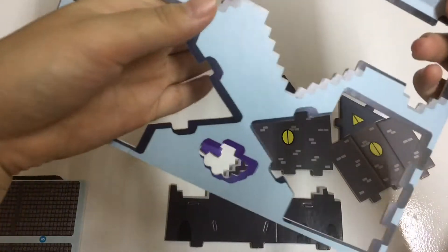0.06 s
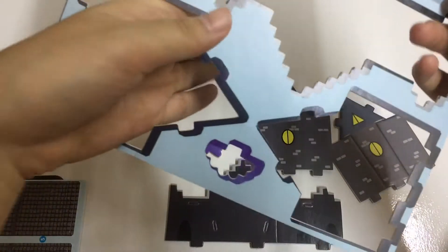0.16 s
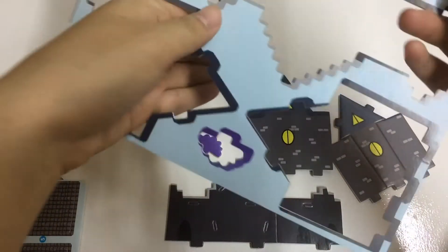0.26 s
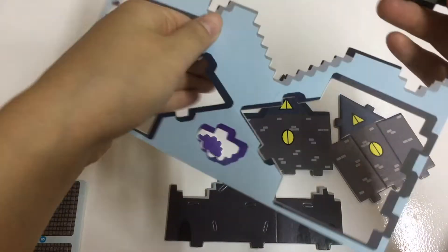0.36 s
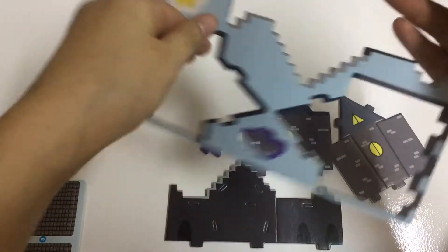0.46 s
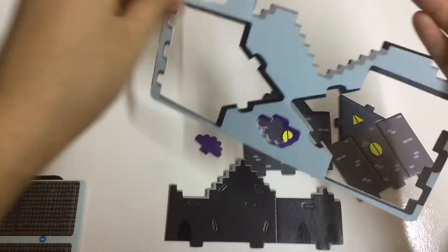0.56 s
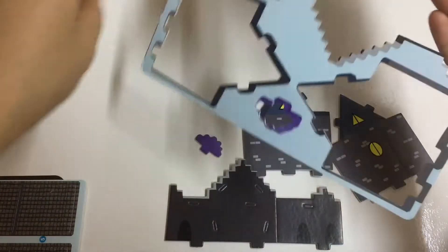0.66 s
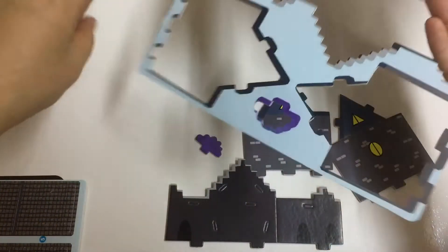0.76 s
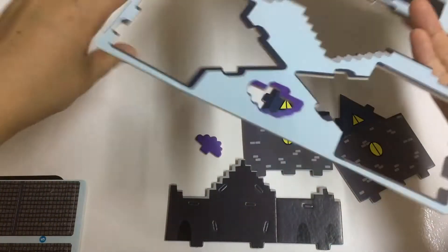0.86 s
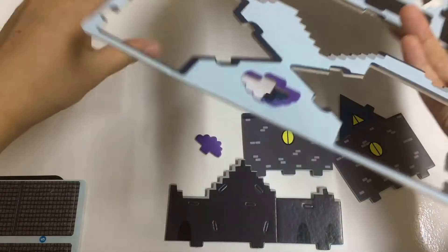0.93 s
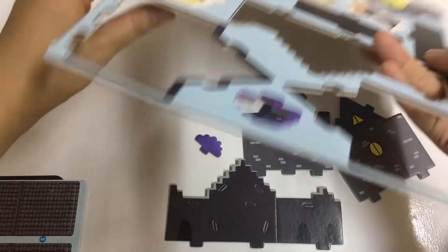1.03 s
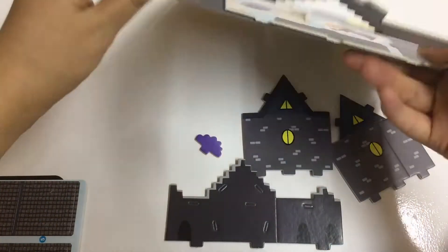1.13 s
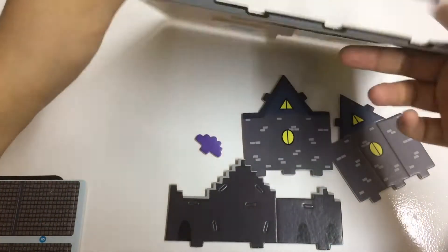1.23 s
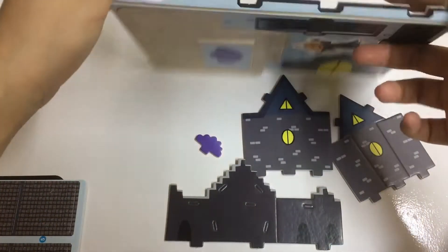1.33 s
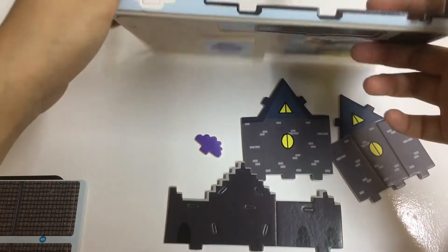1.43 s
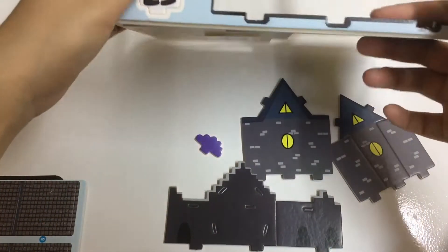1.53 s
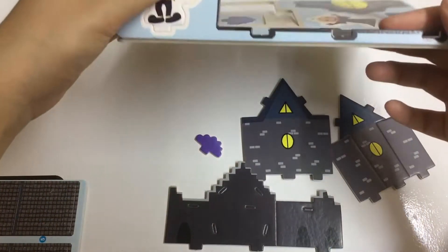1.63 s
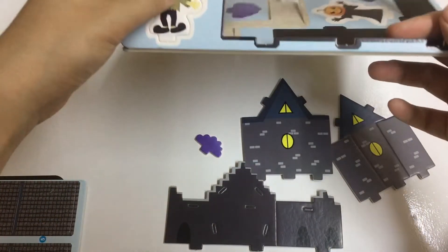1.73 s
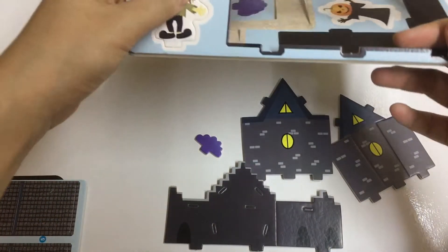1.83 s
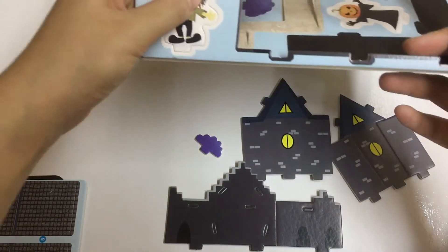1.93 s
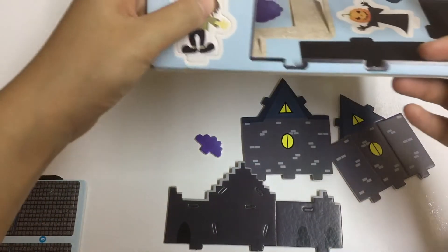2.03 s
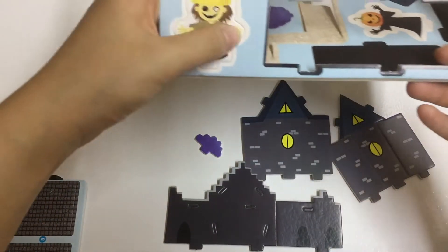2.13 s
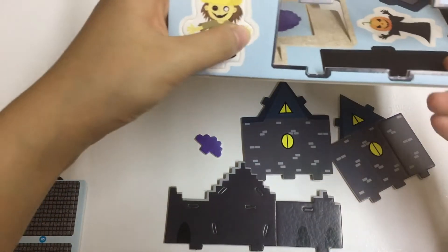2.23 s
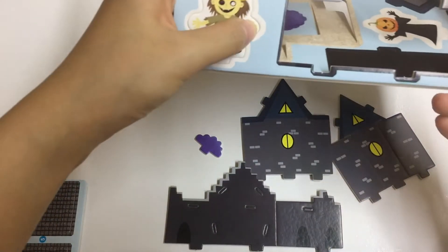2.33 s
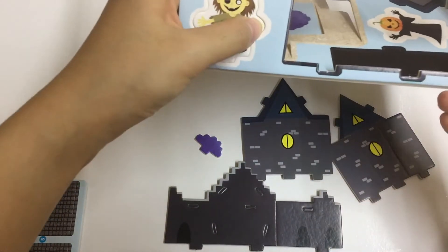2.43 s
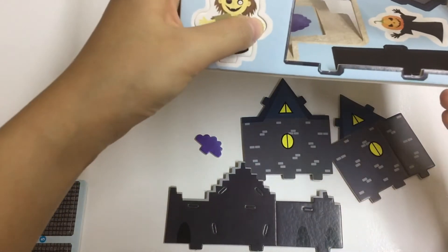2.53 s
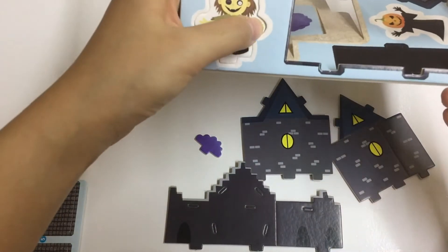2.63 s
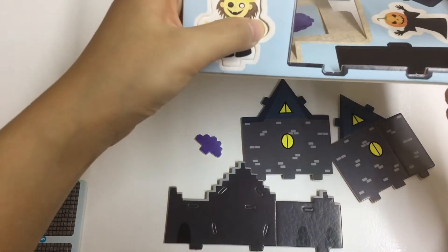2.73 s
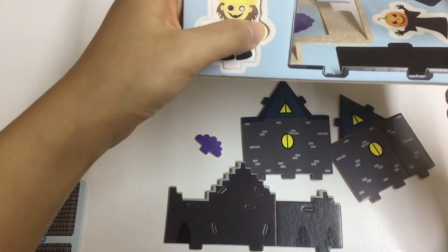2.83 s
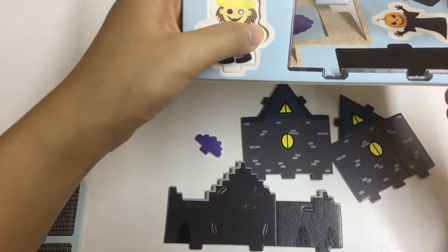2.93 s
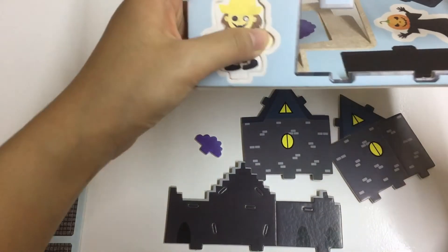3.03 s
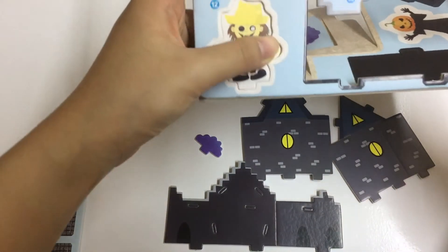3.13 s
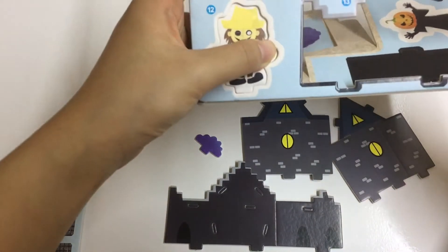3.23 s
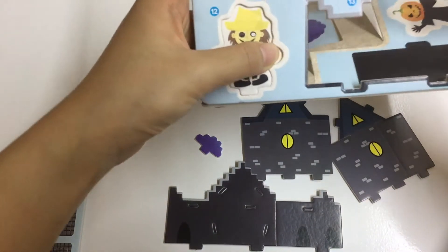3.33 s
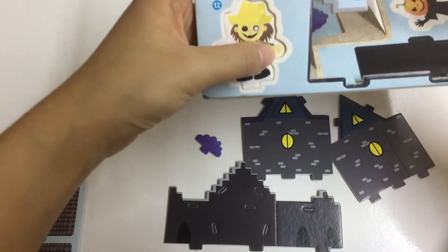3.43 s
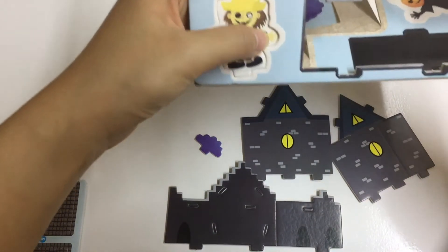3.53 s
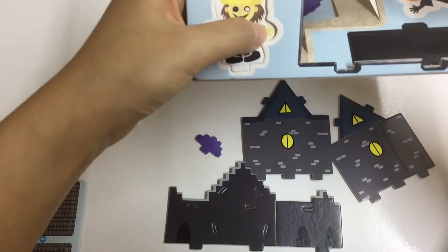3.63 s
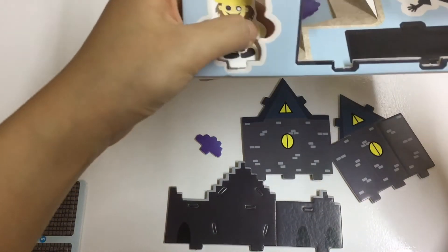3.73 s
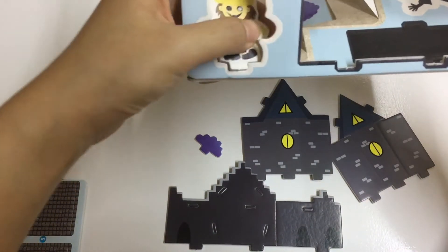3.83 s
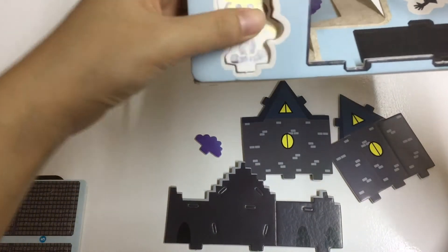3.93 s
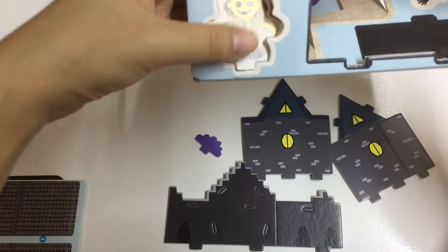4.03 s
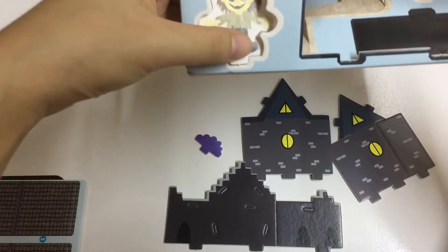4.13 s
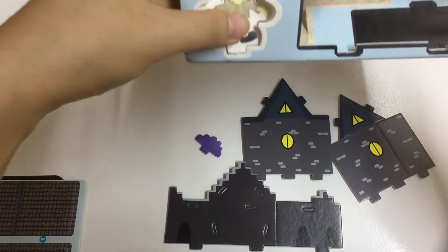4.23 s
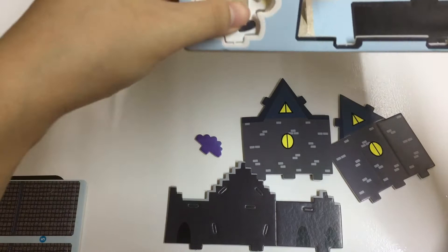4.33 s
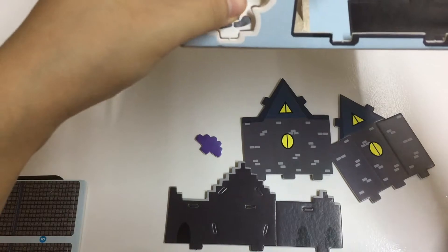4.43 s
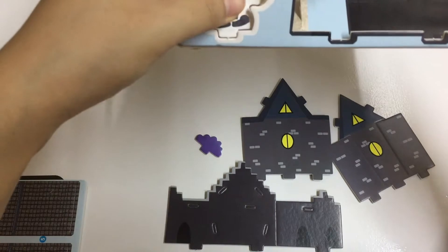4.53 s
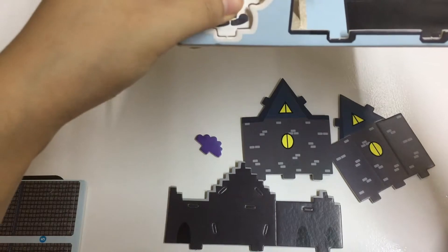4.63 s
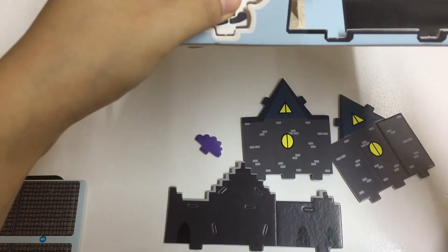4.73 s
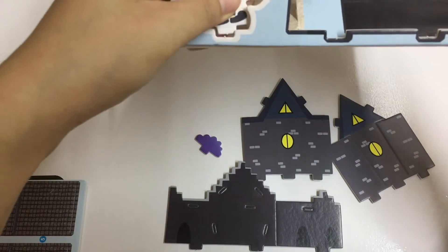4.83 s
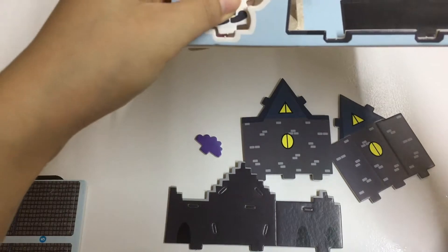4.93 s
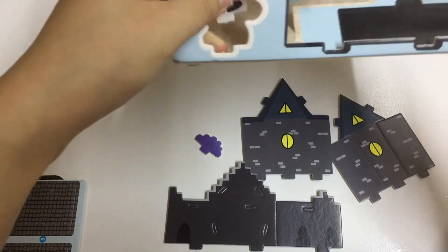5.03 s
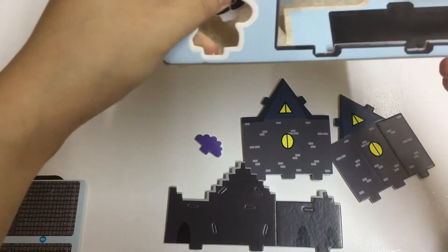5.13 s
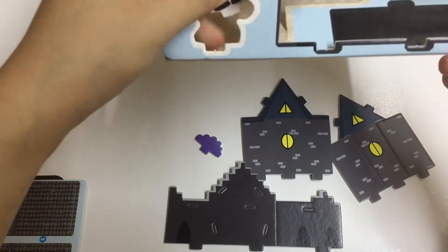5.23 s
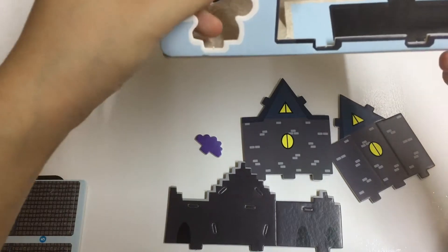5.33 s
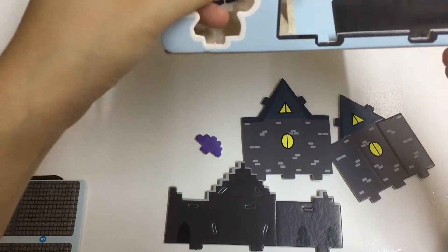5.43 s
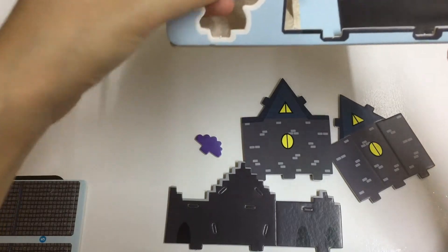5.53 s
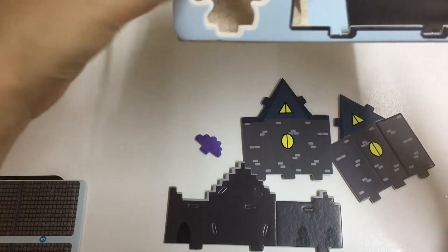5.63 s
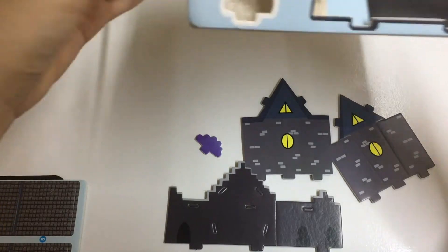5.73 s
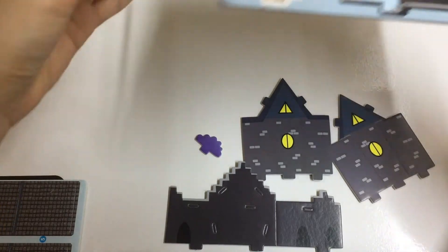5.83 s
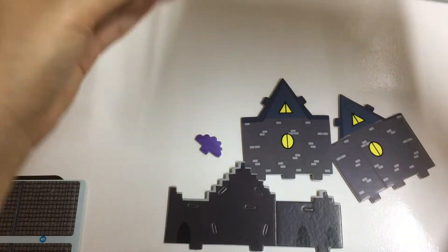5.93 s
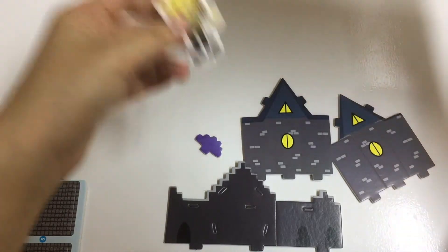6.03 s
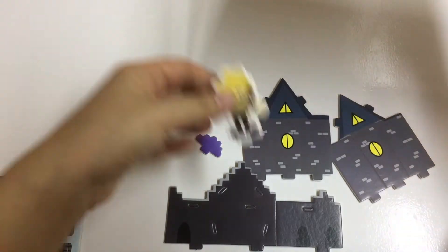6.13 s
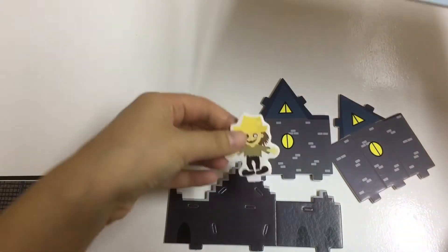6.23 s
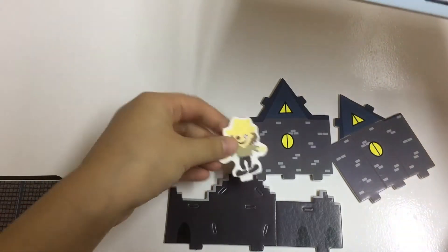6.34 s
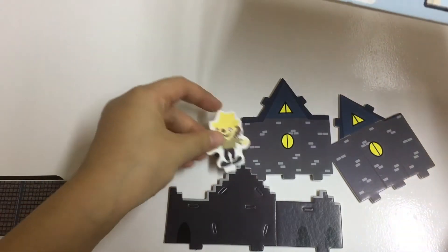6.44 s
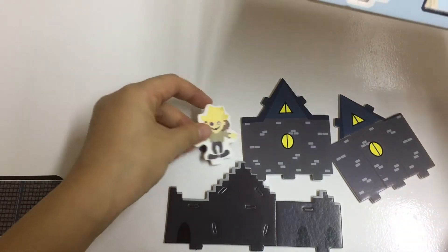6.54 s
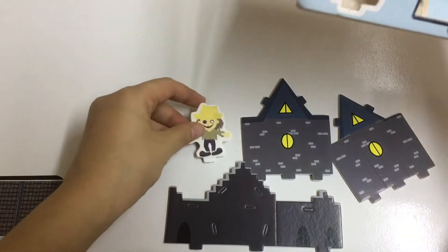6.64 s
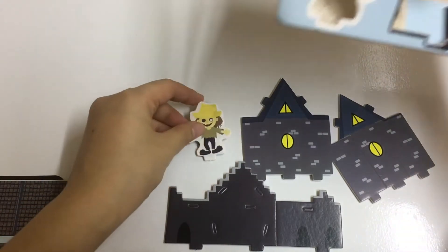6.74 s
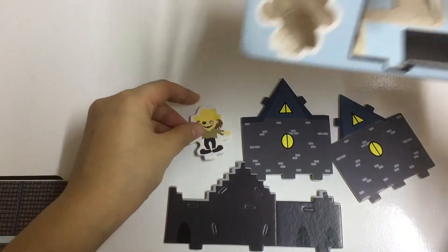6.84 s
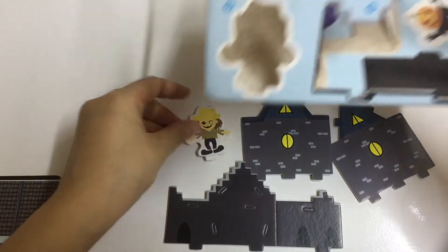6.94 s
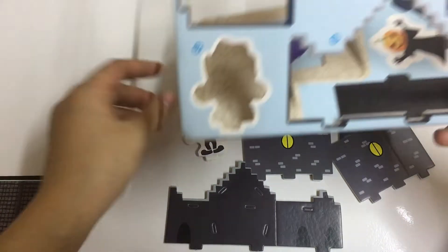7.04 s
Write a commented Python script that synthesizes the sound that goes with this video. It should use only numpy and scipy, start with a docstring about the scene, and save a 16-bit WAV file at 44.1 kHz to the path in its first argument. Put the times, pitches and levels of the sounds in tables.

```python
"""Dry snaps lead: hands press die-cut pieces out of a foam board sheet over a table, close to a phone microphone.
Each snap is a sharp break plus spiky tearing noise that shakes the resonances of the sheet.
Fingers and edges rub as grainy noise; short grainy bursts scrape, crackle or knock; faint ticks fall by chance.
Pushes ring the table top as decaying sines; a bare room answers the sheet with diffuse noise tails.
Underneath lie a quiet low drone and hiss, both coloured noise."""
import sys
import numpy as np
from scipy import signal
from scipy.fft import rfft, irfft, next_fast_len
from scipy.io import wavfile
from scipy.ndimage import map_coordinates

SR = 44100
rng = np.random.default_rng(int(sys.argv[2]) if len(sys.argv) > 2 else 0)


def put_to_file(sound):
    """Save the sound as 16-bit audio at rate SR, in the file named by the first command-line argument."""
    columns = np.atleast_2d(sound).T  # one column per channel
    safe = np.clip(columns, -1, 1)
    whole_steps = np.round(safe * 32767)
    wavfile.write(sys.argv[1], SR, whole_steps.astype(np.int16))


def ratio(d):
    """dB to gain"""
    e = np.asarray(d, float) / 20
    return 10 ** e


N = 311787  # length in samples

# fingers and edges sliding on the sheet: t/s, level before trim and grain/dB, treble against level/dB
RUB_CURVE = [(0.0, -66.5, 0.5), (0.4, -62.5, -0.5), (0.71, -74.5, -1.5), (1.0, -67, -0.5),
             (1.25, -56.5, -1), (1.41, -55, -13), (1.75, -65.5, -3), (2.05, -66, 1.5), (2.85, -62, -5),
             (2.96, -67.5, 2), (3.12, -57, -13), (3.95, -59, 4), (4.14, -61.5, -17), (4.37, -64.5, 5.5),
             (4.51, -73.5, -12.5), (4.94, -65, -18), (5.35, -73, 7.5), (5.47, -75.5, -5.5), (5.62, -59, -4),
             (5.77, -62, 0.5), (5.85, -68, -20), (6.05, -74, -2.5), (6.25, -87.5, 5), (7.07, -69, -25)]
# colours of the rubbing, low to high: f/Hz, relative density/dB per Hz
DULL_COLOUR = [(150, -28.5), (300, 3), (600, -6.5), (1200, -6), (2000, -28.5)]
MIDDLE_COLOUR = [(900, -25.5), (1500, -2.5), (3300, -5), (5000, -7), (7000, -34)]
HISSING_COLOUR = [(4000, -22.5), (6000, 1), (9300, -0.5), (13500, -1.5), (16000, -8)]
RUB_TRIM_DB = -5.5
MIDDLE_FOLLOWS, MIDDLE_DB = .6, -2  # share of the treble's swing that the middle takes, and its offset

# drone of distant machines over time: t/s, level/dB
DRONE_LEVEL = [(0.0, -70), (0.06, -69), (0.98, -67.5), (1.18, -61.5), (1.83, -69), (5.18, -66.5),
               (6.18, -70.5), (7.07, -65)]
# colour of that drone: f/Hz, relative density/dB per Hz
DRONE_COLOUR = [(25, -23.5), (40, -12.5), (55, 3.5), (75, -6.5), (98, 3), (125, -6.5), (195, -6.5),
                (260, -35.5)]
# colour of the microphone hiss: f/Hz, relative density/dB per Hz
AIR_COLOUR = [(150, -8.5), (250, -1), (320, -5.5), (500, -14.5), (1000, -19.5), (2500, -27), (6300, -27),
              (10000, -32.5), (13000, -35), (16500, -41.5)]
AIR_DB = -72  # mean hiss level

# breaking foam bridges and edge ticks: t/s, drive of the crack/dB, then against it: bending/dB, click/dB, fizz/dB
BREAKS = [(0.034, -50, -11, -9, -6), (0.0884, -36.5, -29, -12, -8.5), (0.2188, -44, -5.5, -31, -9),
          (0.2484, -48, 1.5, -13, 1.5), (0.6916, -43, -6.5, -7.5, -4), (0.875, -53, -5.5, -18, 8),
          (1.066, -34.5, 0.5, -8.5, -8), (1.368, -41, 9, -8, -10), (2.0687, -49.5, 1.5, -7, -10.5),
          (2.1956, -39.5, -0.5, 2.5, -0.5), (2.2476, -40.5, -3.5, -4, -4.5),
          (2.3519, -22, -12, -3.5, -10.5), (2.5476, -48, -15, -12, -4.5), (2.6027, -31.5, -8, -6, -3),
          (2.661, -14.5, -8.5, -33, -7.5), (2.9079, -39, -13, -2.5, 0), (3.0684, -57, 8, -6, 0),
          (3.0854, -57, 9.5, -2, -19), (3.1228, -52.5, 6, -4, -9.5), (3.1921, -29.5, 2.5, -3, 1.5),
          (3.235, -18.5, -11, -17, -16), (3.2466, -20, -9.5, -17.5, -5.5), (3.2809, -21.5, -8.5, -18, -8),
          (3.2987, -12.5, -8.5, -17, -6), (3.6503, -24, -23.5, -1, -1.5), (3.682, -22.5, -16, 2.5, 0),
          (3.7111, -6.5, -18, -3.5, -3.5), (3.7156, -18, -33, 2.5, 0), (3.7324, -20.5, -9, 10, -13.5),
          (4.1618, -49, -22, 4.5, -5), (4.1699, -39.5, -14, -5, -14), (4.1775, -38.5, -8.5, -3, -10.5),
          (4.1913, -48, -1, 0, -4), (4.2711, -53, -8, -11, 1), (4.3039, -47, -7, -12.5, 1),
          (4.3314, -38.5, -29, -18.5, 3), (4.4375, -41, -6, -16, -8), (4.7555, -33, -9.5, -23.5, -3),
          (4.9484, -48.5, -15, -17.5, -12), (5.0432, -10.5, -13.5, -17, -18),
          (5.4669, -37.5, -10, -23.5, -15.5), (5.7475, -49.5, -12, 2, -7.5), (5.7686, -49.5, -5, -4.5, 1),
          (5.9306, -35, -16.5, -17.5, -23.5), (6.2237, -54.5, -17.5, -8, -13),
          (6.766, -51, -14.5, -9.5, -7), (6.8498, -50, -10.5, -28, -4), (6.864, -46, -8, -31.5, -13.5)]
# resonances in groups: crack of the paper skin, whole sheet flexing, panel between the cut-outs,
# click of the piece, fizz of the foam cells; each mode: f/Hz, width/Hz, level/dB
SHEET_MODES = [
    [(4510, 5100, 17), (6500, 2800, 15)],
    [(457, 790, 27), (750, 600, 29)],
    [(1260, 600, 26.5), (2220, 1000, 21.5)],
    [(3350, 1500, 26.5)],
    [(9230, 2600, 22.5), (12500, 5400, 23)],
]
# early echoes off table, hands and near wall: mean delay/s, level/dB
EARLY_ECHOES = [(.0011, -13), (.0023, -3.5), (.0031, -18.5), (.0047, -6.5), (.009, -12.5)]
PANEL_DB = 1.4  # the panel bends along with the whole sheet, this much stronger
TICKS_PER_S, TICK_DB, TICK_SPREAD_DB = 3.7, 14, 1.5  # chance ticks: rate, drive over the rubbing curve, spread
# make-up of a chance tick against its crack: bending/dB, click/dB, fizz/dB
TICK_SHARES = (-10.5, -9, -5)
SNAP_DELAY_S = .0007  # small fixed delay of every snap and tick

# short grainy bursts, from scrapes and crackles to dull knocks: start t/s, length/s, level/dB, centre f/Hz
GRAINY_BURSTS = [(0.245, 0.28, -67.5, 4100), (0.421, 0.064, -65, 3050), (1.267, 0.045, -56, 3030),
                 (3.012, 0.047, -63, 5260), (3.303, .018, -34, 1130), (4.13, .03, -56.5, 552),
                 (4.166, 0.0903, -53, 626), (4.294, 0.01, -50, 3890), (4.506, 0.012, -59.5, 6500),
                 (4.8, 0.032, -65.5, 5500), (5.017, 0.022, -52.5, 3000), (5.038, 0.0047, -33, 5200),
                 (5.588, 0.051, -62.5, 3450), (5.642, 0.035, -61, 2390), (5.756, 0.027, -61.5, 3400),
                 (6.729, 0.048, -71.5, 4020)]
# hiss against the resonance of a burst: centre f/Hz, level/dB
BURST_HISS_LEVEL = [(600, -15), (1100, 3), (4000, 2.5)]

# pushes that set the table top humming: t/s, level before trim/dB, all modes but the first against it/dB
TABLE_PUSHES = [(0.247, -52, -1), (1.064, -54, 11.5), (1.368, -33, -13.5), (2.072, -57, -11),
                (2.193, -55, 6), (2.66, -42.5, 7), (3.192, -56.5, 16.5), (3.299, -43.5, 3),
                (3.714, -33.5, -7), (4.177, -51, 12), (4.435, -58, -0.5), (4.756, -51.5, 2.5),
                (5.043, -47, 2.5), (5.627, -51, -1), (5.766, -46.5, -7), (6.855, -60, 5.5)]
# modes of the table top, the one with steady pitch first: f/Hz, level/dB, t60/s
TABLE_MODES = [(325.4, -1, 0.76), (259.5, -7.5, 0.45), (369, -7.5, 0.44), (444, -7.5, 0.93),
               (550, -3.5, 0.82), (578, -4.5, 0.86)]
PUSH_TRIM_DB = -9.0
UPPER_BLUR_HZ = 6.5  # random pitch drift roughens all modes but the first

# decay of the bare room: f/Hz, t60/s
ROOM_DECAY = [(200, 0.21), (530, .75), (1400, 0.78), (3700, 0.53), (9700, .33), (16000, 0.35)]
# dips of the microphone port: f/Hz, width/Hz, level/dB
PORT_DIPS = [(7650, 717, -2.5), (10300, 430, -2.5)]
TOP_HZ, OVERLOAD = 16600, .85  # recorder's band limit; level where the preamp flattens


def unit(x):
    """Scales a signal to rms 1."""
    return x / np.sqrt(np.mean(x ** 2) + 1e-20)


def along(points, hz):
    """Reads (Hz, value) points on a log frequency axis."""
    f, v = np.transpose(points)
    return np.interp(np.log(hz + 1), np.log(f + 1), v)


def filtered(x, response):
    """Filters x with a complex response of frequency."""
    m = next_fast_len(x.shape[-1] + 4096)
    spectrum = rfft(x, m) * response(np.fft.rfftfreq(m, 1 / SR))
    return irfft(spectrum, m)[..., :x.shape[-1]]


def noise(colour):
    """Makes coloured noise of rms 1."""
    return unit(filtered(rng.standard_normal(N), lambda hz: ratio(along(colour, hz))))


def wobble(rate):
    """Draws a smooth random curve, rate knots a second."""
    knots = rng.standard_normal(int(N * rate / SR) + 4)
    return map_coordinates(knots, [np.arange(N) * rate / SR])


def add(out, s, x):
    """Mixes x into out from time s on."""
    out[round(s * SR):][:len(x)] += x


def room(x, wet_db):
    """Adds a diffuse tail, new for each sound, whose decay time depends on frequency."""
    hz, t, z = signal.stft(rng.standard_normal(SR * 3 // 4), SR, nperseg=256)
    decay = ratio(-60 * t / along(ROOM_DECAY, hz)[:, None])
    tail = signal.istft(z * decay, SR, nperseg=256)[1]
    build_up = 1 - np.exp(-np.arange(len(tail)) / SR / 0.0037)
    answer = ratio(wet_db) * tail / np.linalg.norm(tail) * build_up
    return signal.fftconvolve(x, answer)


def rubbing():
    """Stick and slip of skin on paper: noise in uneven grains, heard through the room piece by piece."""
    s, level_db, treble_db = np.transpose(RUB_CURVE)
    middle_db = level_db + MIDDLE_DB + MIDDLE_FOLLOWS * treble_db
    levels_db = level_db, middle_db, level_db + treble_db
    time = np.arange(N) / SR
    grip = 1.8 * wobble(25) + 2.7 * wobble(180)  # dB, shared by all bands
    dry = np.zeros(N)
    for db, colour in zip(levels_db, (DULL_COLOUR, MIDDLE_COLOUR, HISSING_COLOUR)):
        band_db = np.interp(time, s, db) + RUB_TRIM_DB + grip + 1.5 * wobble(27)
        dry += ratio(band_db) * noise(colour)
    out, step = np.pad(dry, (0, 2 * SR)), SR // 3
    for k in range(0, N, step):
        add(out, k / SR, room(dry[k:k + step], wet_db=-9))
    return out[:N]


def air():
    """Distant machines drone as low noise under gently wavering microphone hiss."""
    drone_db = np.interp(np.arange(N) / SR, *np.transpose(DRONE_LEVEL))
    drone = ratio(drone_db) * noise(DRONE_COLOUR)
    hiss = ratio(AIR_DB + .7 * wobble(1.7)) * noise(AIR_COLOUR)
    return drone + hiss


def ringing(shares_db, uneven_db, size=8192):
    """Causal impulse response of the sheet: the groups of resonances add in power, at minimum phase."""
    f = np.fft.rfftfreq(size, 1 / SR)
    power = np.zeros(len(f))
    for share_db, modes in zip(shares_db, SHEET_MODES):
        for centre, width, db in modes:
            damping = (f * width) ** 2
            resonance = damping / ((centre * centre - f * f) ** 2 + damping)
            power += ratio(2 * (share_db + db)) * resonance ** 2
    # a random ripple gives every snap a slightly different colour
    ripple_db = uneven_db * map_coordinates(rng.standard_normal(80), [9 * np.log(1 + f / 100)])
    # folding the cepstrum onto positive time gives minimum phase
    cepstrum = irfft(np.log(ratio(ripple_db) * np.sqrt(power + 1e-8)))
    cepstrum[1:size // 2] *= 2
    cepstrum[size // 2 + 1:] = 0
    return irfft(np.exp(rfft(cepstrum)))[:size // 8]


def ticks():
    """Scatters faint chance ticks whose strength follows the rubbing."""
    draw = rng.random((round(TICKS_PER_S * N / SR), 2))
    s = draw[:, 0] * N / SR
    rub_db = np.interp(s, *np.transpose(RUB_CURVE)[:2])
    db = rub_db + TICK_DB - TICK_SPREAD_DB * np.log(draw[:, 1] + .05)
    return [(when, size_db, *TICK_SHARES) for when, size_db in zip(s, db)]


def snaps():
    """A sharp break and a few ms of spiky tearing shake each group of resonances at its own strength."""
    out, t = np.zeros(N + SR), np.arange(512) / SR
    for s, db, bend_db, *bright_db in list(BREAKS) + ticks():
        shares_db = [0, bend_db, bend_db + PANEL_DB, *bright_db]
        spikes = rng.standard_normal(len(t)) * ratio(4 * rng.standard_normal(len(t)))
        tear = spikes * ratio(-14.5 - 60 * t / .012)  # 60 dB down in 12 ms
        tear[0] = 1  # the break itself
        for lag, echo_db in EARLY_ECHOES:
            tear[round(lag * SR * rng.uniform(.85, 1.15))] += ratio(echo_db) * rng.choice([-1, 1])
        near = ringing(shares_db, uneven_db=2.5)
        # the room gathers the sheet from all sides, which evens out the ripple
        around = ringing(shares_db, uneven_db=1.3)
        start = s + SNAP_DELAY_S
        add(out, start, ratio(db) * signal.fftconvolve(tear / np.linalg.norm(tear), near))
        add(out, start, ratio(db) * room(around, wet_db=-5.0))
    return out[:N]


def grainy_bursts():
    """Short scrapes, crackles and dull knocks: gritty noise through one resonance, plus a broad hiss."""
    out = np.zeros(N + SR)
    for s, length, db, hz in GRAINY_BURSTS:
        count = round(length * SR)
        width = 350 + 0.19 * hz  # Hz
        grit = rng.standard_normal((2, count)) * ratio(5.1 * rng.standard_normal(count))
        body = unit(filtered(grit[0], lambda f: (1j * f * width / (hz * hz - f * f + 1j * f * width)) ** 2))
        hiss = unit(filtered(grit[1], lambda f: ratio(along(HISSING_COLOUR, f))))
        swell = np.hanning(count) ** 0.5
        sound = ratio(db) * swell * (body + ratio(along(BURST_HISS_LEVEL, hz)) * hiss)
        add(out, s, sound)
        add(out, s, room(sound, wet_db=-9.5))
    return out[:N]


def table():
    """Soft pushes ring the low modes of the table top as decaying sines, each a little differently."""
    out, t = np.zeros(N + SR), np.arange(SR) / SR
    for s, db, others_db in TABLE_PUSHES:
        # a random walk of phase widens every mode but the first
        steps = rng.standard_normal((len(TABLE_MODES), SR))
        drift = np.sqrt(2 * np.pi * UPPER_BLUR_HZ / SR) * np.cumsum(steps, axis=1)
        hum = np.zeros(SR)
        for k, (hz, level_db, t60) in enumerate(TABLE_MODES):
            upper = k > 0
            mode_db = level_db + (others_db + rng.normal(0, 2.2)) * upper - 60 * t / t60
            hum += ratio(mode_db) * np.sin(2 * np.pi * hz * t + drift[k] * upper)
        soft_onset = 1 - np.exp(-t / 0.0048)
        add(out, s, ratio(db + PUSH_TRIM_DB) * hum * soft_onset)
    return out[:N]


def scene():
    """Sums all sources at one microphone."""
    return (rubbing() + air() + snaps() + grainy_bursts() + table())[None]


def low_pass(x):
    """Removes everything above the highest recorded frequency."""
    return signal.sosfilt(signal.butter(12, 16810, fs=SR, output="sos"), x)


def record(dry):
    """Soft overload of the preamp, then the microphone port's dips and the recorder's band limit."""
    def response(hz):
        dips_db = sum(db * np.exp(-((hz - c) / w) ** 2) for c, w, db in PORT_DIPS)
        return ratio(dips_db) / (1 + (hz / TOP_HZ) ** 60)

    overloaded = dry / (1 + abs(dry / OVERLOAD) ** 4) ** (1 / 4)
    mix = filtered(overloaded, response)
    return low_pass(mix)


dry = scene()
out = record(dry)
put_to_file(out)
```